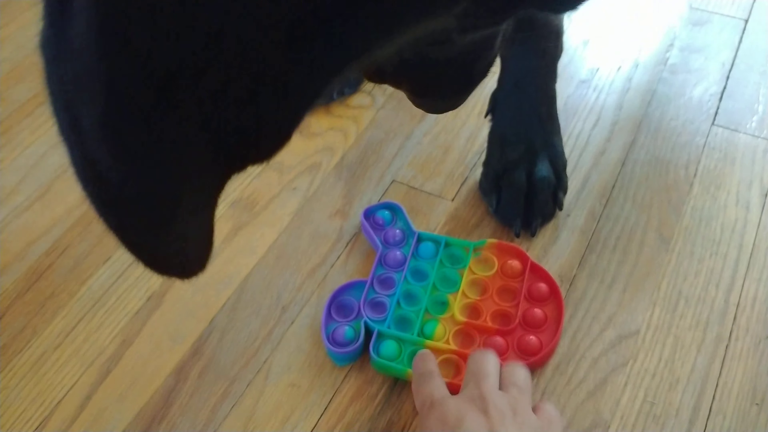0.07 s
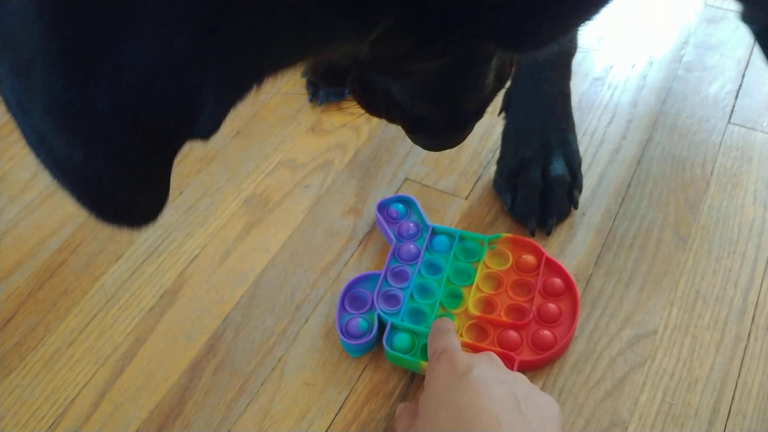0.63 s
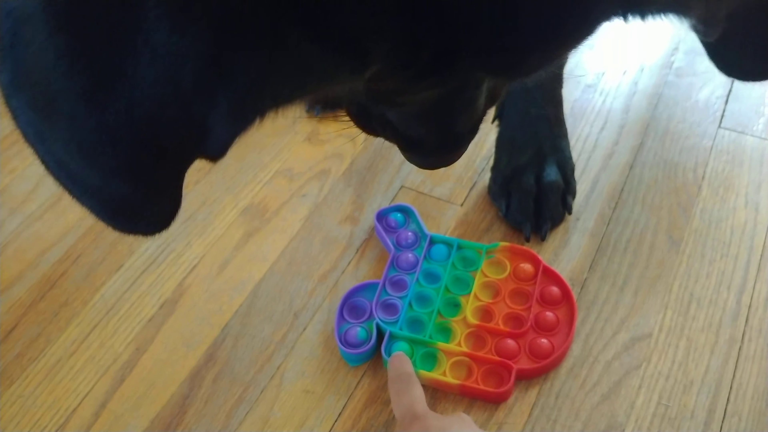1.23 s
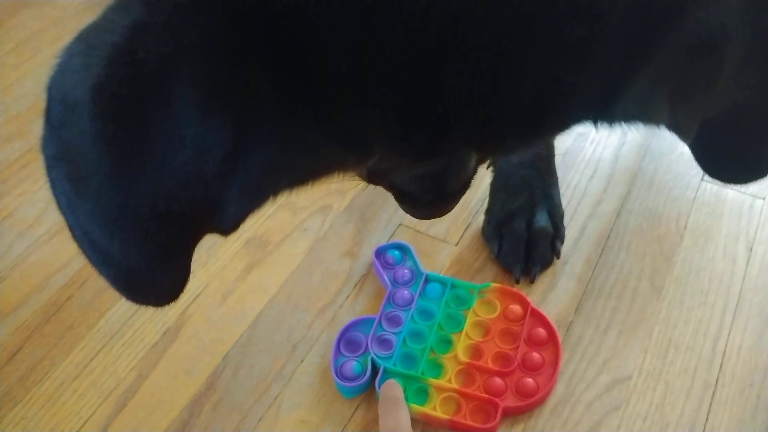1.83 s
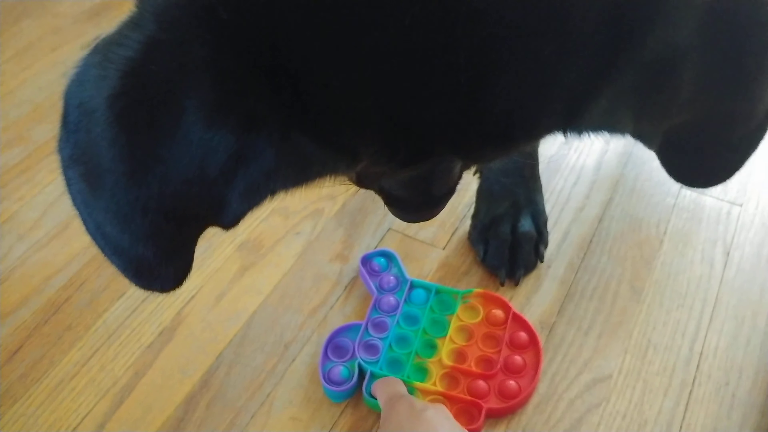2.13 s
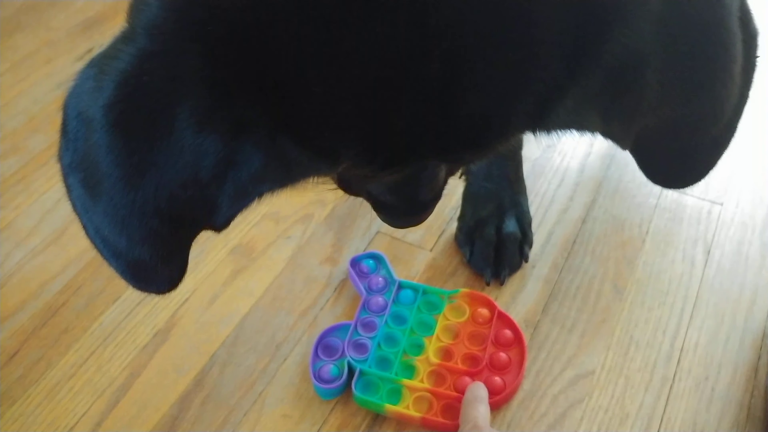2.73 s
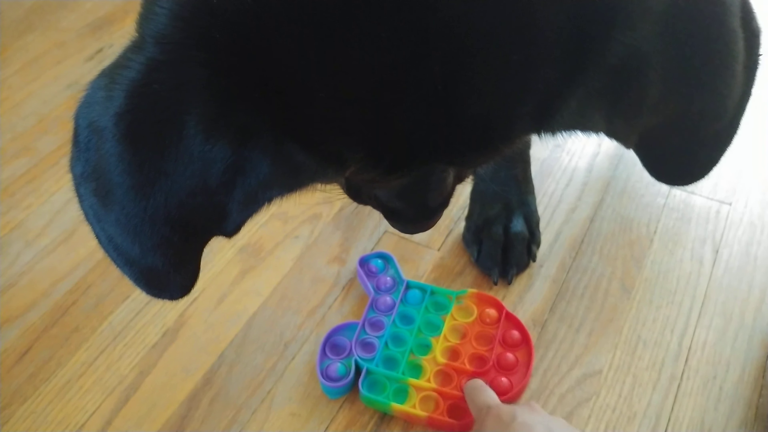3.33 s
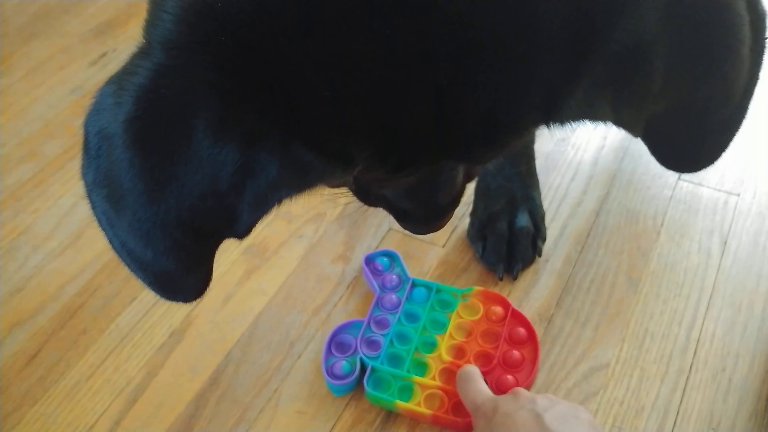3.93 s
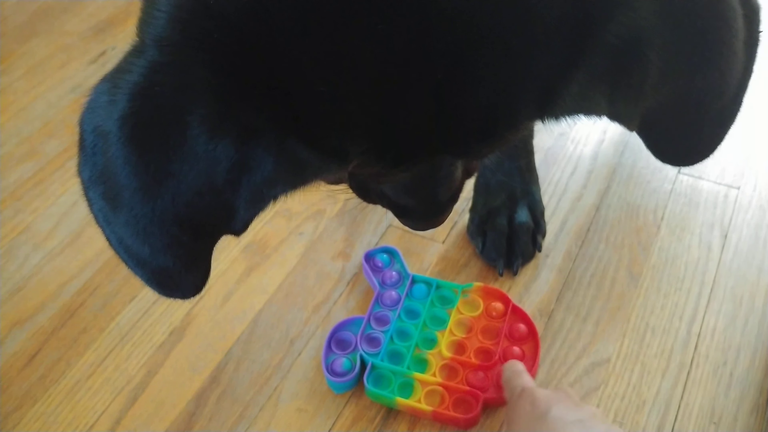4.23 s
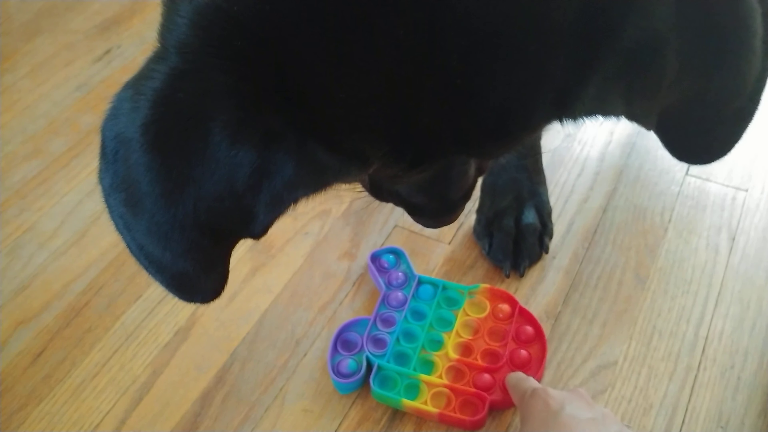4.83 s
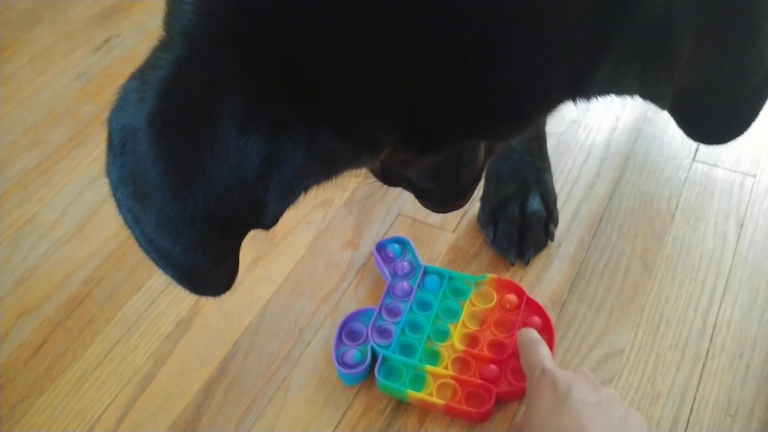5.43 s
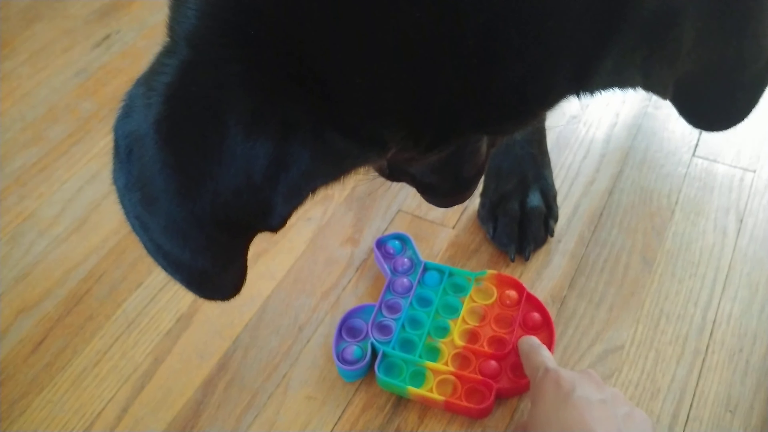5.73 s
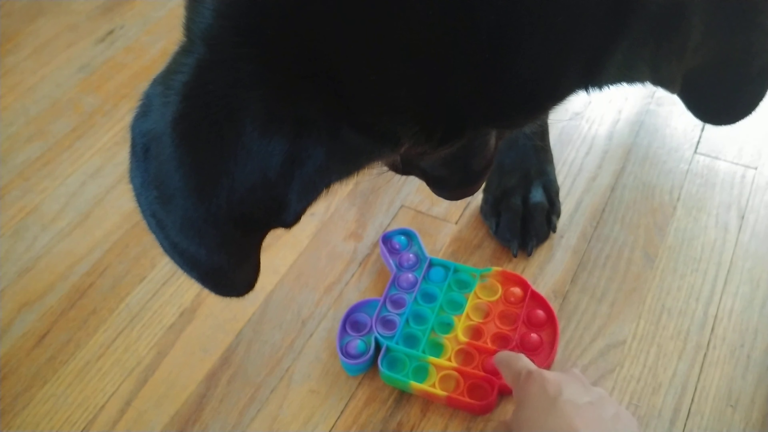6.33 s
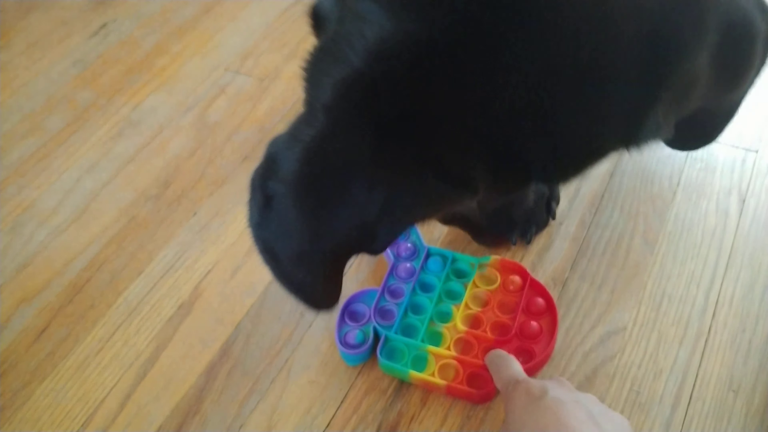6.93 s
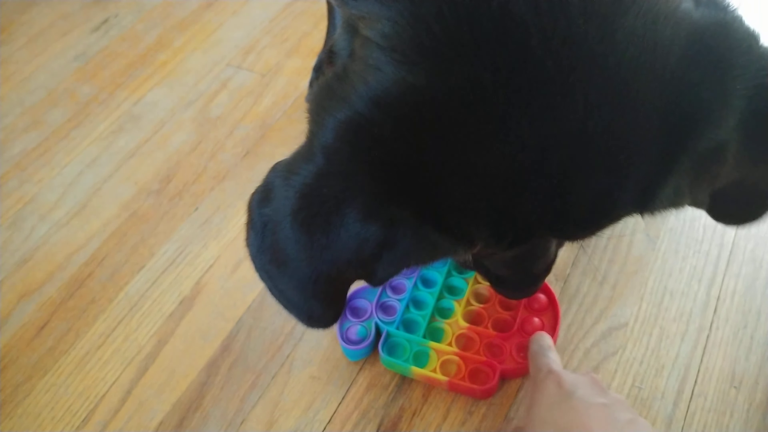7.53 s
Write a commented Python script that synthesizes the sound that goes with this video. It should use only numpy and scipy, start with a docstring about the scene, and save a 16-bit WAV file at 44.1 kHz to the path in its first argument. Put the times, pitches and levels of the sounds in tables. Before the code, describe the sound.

A steady, high hiss, a little like running water, fills a quiet room while a silicone popping toy is pressed by hand near the microphone. The toy taps and thumps softly against the floorboards, with one weak pop early on and some barely audible rubbing. Later come two distinct, slightly hollow pops, the loudest sounds, and a last soft thump follows near the end.

```python
"""Silicone bubble toy on a wooden floor

A finger works the toy: its rim taps the boards, soft impacts thump, and the fingertip rubs
by stick-slip friction. Three domes buckle and snap through, each exciting damped resonances.
The room reverberates briefly. A steady high hiss, like running water, slowly changes colour
above a low room noise. Both channels carry the same signal."""
import sys
import numpy as np
from scipy import signal
from scipy.fft import rfft, irfft, next_fast_len
from scipy.io import wavfile
from scipy.ndimage import uniform_filter1d

SR = 44100
rng = np.random.default_rng(int(sys.argv[2]) if len(sys.argv) > 2 else 0)


def put_to_file(sound):
    """Save the sound as 16-bit audio at rate SR, in the file named by the first command-line argument."""
    columns = np.atleast_2d(sound).T  # one column per channel
    safe = np.clip(columns, -1, 1)
    whole_steps = np.round(safe * 32767)
    wavfile.write(sys.argv[1], SR, whole_steps.astype(np.int16))


N = 339129

# spectral envelope of the hiss: f/Hz, relative level/dB
HISS_SPECTRUM = [(600, -35), (1700, -18), (2600, -9.5), (3400, -7.5), (3900, -3), (5200, 0), (6800, -1),
                 (7700, -3.5), (8800, 0.5), (9900, -8.5), (11000, -14), (12000, -21.5), (13500, -23),
                 (15600, -21)]
# resonances of the hiss: f/Hz, bandwidth/Hz, lift with its path open/dB, lift with it shaded/dB
HISS_RESONANCES = [(2800, 130, 3, 0), (3183, 320, 5.5, 1), (3740, 60, 3.5, 4), (4030, 490, 4.5, -0.5),
                   (5060, 190, 4.5, 5), (5450, 420, 4.5, -4.5), (6200, 430, 4.5, -1), (7136, 153, 9, 2.5),
                   (8130, 500, 2.5, 7.5), (8680, 220, 5, 4), (9550, 110, 7.5, 4), (10200, 810, 1, -1.5),
                   (11240, 220, 4.5, 2)]
# slow drift of the hiss: t/s, level/dB
HISS_ENVELOPE = [(0.0, -50.5), (0.56, -50.5), (0.94, -49), (1.39, -50.5), (2.31, -49.5), (2.7, -51.5),
                 (4.77, -49), (5.1, -50.5), (6.0, -48.5), (6.72, -51.5), (7.0, -50), (7.19, -51.5),
                 (7.65, -52), (7.69, -53)]
# spectral envelope of the room noise: f/Hz, relative level/dB
ROOM_NOISE_SPECTRUM = [(20, -28), (35, -17), (55, -10), (100, -1.5), (170, 0), (230, 0), (320, -5),
                       (550, -7.5), (1000, -9.5), (1700, -13.5), (3000, -19.5), (8000, -57)]
# reverberation time of the room: f/Hz, T60/s
ROOM_DECAY = [(120, 0.1), (300, 0.32), (800, 0.3), (1800, 0.25), (5000, 0.24)]
# the rim striking the boards: t/s, level/dB, f/Hz
RIM_TAPS = [(.0768, -48, 990), (.0815, -54, 745), (.3640, -51.5, 1230), (0.37, -51, 1260),
            (.3715, -50, 910), (.4980, -58, 985), (6.9370, -57, 540)]
# soft blows of finger and sheet on the floor: t/s, level/dB, f/Hz, knock re the blow/dB
SOFT_BLOWS = [(0.1931, -37, 217, -13.5), (0.3718, -43.5, 264, -4), (0.8636, -46, 394, -18),
              (.9790, -50, 128, -17), (1.0480, -60, 284, -17), (1.508, -56, 105, -19),
              (2.026, -49.5, 225, -20), (2.9470, -48, 229, 0), (3.0780, -43, 115, -12),
              (3.4520, -44, 202, -2), (3.7143, -49, 224, -2.5), (3.947, -54, 201, -8),
              (4.4110, -56, 330, -1), (4.995, -45, 215, -11), (5.584, -59.5, 229, 0),
              (5.985, -50, 214, -4.5), (6.8866, -41.5, 110, -18)]
# the fingertip dragging over silicone: t/s, duration/s, level before the envelope/dB
RUB_STROKES = [(0.764, 0.11, -66), (1.018, 0.058, -64), (1.972, 0.067, -63.5), (3.101, 0.15, -64.5),
               (3.73, 0.15, -65.5), (3.854, 0.12, -57.5), (6.776, 0.074, -68)]
# spectral envelope of the friction: f/Hz, relative level/dB
FRICTION_SPECTRUM = [(60, -37), (140, -3), (230, 5), (330, -1.5), (480, -2), (900, -12.5), (1600, -8.5),
                     (2600, -22), (5000, -54)]
# domes snapping through: t/s, level/dB, pulse f/Hz, dome f/Hz, dome level/dB,
# air pocket f/Hz, pocket level/dB, sheet level/dB (the last three levels re the pulse)
DOME_SNAPS = [(.8620, -47, 1400, 1890, 4, 926, 5, -17), (4.3270, -25.5, 1270, 1680, -4, 900, -11, 4.5),
              (6.1925, -29, 1430, 1780, -1, 915, -11, 8)]
# modes of the silicone sheet around the domes: f/Hz, relative level/dB, T60/s
SHEET_MODES = [(265, -30, 0.11), (560, -18.5, 0.013), (740, -31, 0.033), (1490, -25, 0.066),
               (2060, -24, 0.025), (3000, -28.5, 0.046)]


def amp(db):
    """Amplitude ratio of a level in decibels."""
    return 10 ** (np.asarray(db) / 20)


def unit_rms(x):
    """Normalisation to an rms of 1."""
    return x / np.sqrt(np.mean(x ** 2) + 1e-20)


def log_interp(points, hz):
    """Interpolation of (f, value) points on a logarithmic frequency axis."""
    f, values = np.transpose(points)
    return np.interp(np.log(hz + 1), np.log(f + 1), values)


def filtered(x, response):
    """Linear filtering: the spectrum is multiplied by a frequency response."""
    size = next_fast_len(len(x) + 8192)
    return irfft(rfft(x, size) * response(np.fft.rfftfreq(size, 1 / SR)), size)[:len(x)]


def coloured(x, spectrum):
    """Spectral shaping by (f, level) points, at an rms of 1."""
    return unit_rms(filtered(x, lambda hz: amp(log_interp(spectrum, hz))))


def low_cut(x, hz, order=2):
    """Butterworth high-pass filtering."""
    return signal.sosfilt(signal.butter(order, hz, "highpass", fs=SR, output="sos"), x)


def add(track, start_s, x):
    """Superposition of x on the track from a given time."""
    i = max(round(start_s * SR), 0)
    track[i:i + len(x)] += x[:max(len(track) - i, 0)]


def in_room(x, wet_db, build_s=0.0019, gap_s=0.0047):
    """Reverberation: a diffuse, decaying tail builds up once the nearest walls reflect the sound."""
    hz, t, bands = signal.stft(rng.standard_normal(SR // 2), SR, nperseg=256)
    tail = signal.istft(bands * amp(-60 * t / log_interp(ROOM_DECAY, hz)[:, None]), SR)[1]
    since = np.maximum(np.arange(len(tail)) / SR - gap_s, 0)
    tail *= 1 - np.exp(-(since / build_s) ** 2)
    return x + amp(wet_db) * signal.fftconvolve(x, tail / np.linalg.norm(tail))[:len(x)]


def ring(t, hz, t60):
    """Free vibration of a damped oscillator, starting at t = 0."""
    t = np.maximum(t, 0)
    return np.sin(2 * np.pi * hz * t) * np.exp(-np.log(1000) * t / t60)


def soft_ring(t, hz, t60, swell_cycles=0.43):
    """Compliant contact: rubber yields for half a cycle before it pushes at t = 0; the peak is 1."""
    since = np.maximum(t + .5 / hz, 0)
    swell = 1 - np.exp(-(since * hz / swell_cycles) ** 2)
    x = -ring(since, hz, t60) * swell
    return x / abs(x).max()


def pressure_pulse(t, hz):
    """A transient centred on t = 0: rarefaction, compression, rarefaction."""
    u = (np.pi * hz * t) ** 2
    return (1 - 2 * u) * np.exp(-u)


def smooth_field(shape, bins, frames):
    """Random fluctuation, correlated over frequency and time by moving averages."""
    across_frequency = uniform_filter1d(rng.standard_normal(shape), size=bins, axis=0)
    return unit_rms(uniform_filter1d(across_frequency, size=frames, axis=1))


def hiss(shade_from_s=2.6, shade_per_s=.19, patch_db=1.03, ripple_db=3.5, ripple_top_hz=11500):
    """Filtered noise: resonances change as its path is shaded; random ripple stands for interference."""
    hz, t, bands = signal.stft(rng.standard_normal(N), SR, nperseg=4096)
    shade = np.clip(shade_per_s * (t - shade_from_s), 0, 1)  # 0 open, 1 shaded
    colour_db = log_interp(HISS_SPECTRUM, hz)[:, None]
    for centre, width, open_db, shaded_db in HISS_RESONANCES:
        bump = .5 ** ((2 * (hz - centre) / width) ** 2)
        colour_db = colour_db + np.outer(bump, open_db + (shaded_db - open_db) * shade)
    patches = smooth_field(bands.shape, bins=9, frames=8)
    ripple = smooth_field(bands.shape, bins=2, frames=40)
    # the walls absorb the highest frequencies, so reflections ripple these less
    depth_db = ripple_db / (1 + (hz[:, None] / ripple_top_hz) ** 4)
    noise = signal.istft(bands * amp(colour_db + patch_db * patches + depth_db * ripple), SR)[1][:N]
    level_db = np.interp(np.arange(N) / SR, *np.transpose(HISS_ENVELOPE)) - 0.03
    return unit_rms(noise) * amp(level_db)


def room_noise(level_db=-68.5):
    """Stationary background noise, strongest at low frequencies."""
    return coloured(rng.standard_normal(N), ROOM_NOISE_SPECTRUM) * amp(level_db)


def rim_taps(wet_db=-5, rim_t60=0.028, ring_spill=0.54, click_gain=0.98):
    """Impulse excitation: the stiff rim meets the floor with a click and one damped mode."""
    out, t = np.zeros(N), np.arange(-SR // 200, SR // 2) / SR
    for start, db, hz in RIM_TAPS:
        rim = ring(t, hz, rim_t60)
        click = click_gain * pressure_pulse(t, hz)
        # the click fills the room; the ring is heard more directly
        tap = in_room(click + ring_spill * rim, wet_db) + (1 - ring_spill) * rim
        add(out, start + t[0], amp(db) * tap)
    return out


def thumps(wet_db=-8, body_t60=0.035, sheet_hz=220, knock_hz=470, knock_t60=0.02,
           tick_hz=1900, tick_t60=0.024):
    """Damped impact of rubber on wood: a few low cycles, a knock of the board and a contact tick."""
    out, t = np.zeros(N), np.arange(-SR // 100, SR // 2) / SR
    for start, db, hz, knock_db in SOFT_BLOWS:
        # blows below the sheet's usual pitch, pressed flat on the boards, die sooner
        t60 = body_t60 * min(hz / sheet_hz, 1) ** 1.85
        body = low_cut(soft_ring(t, hz, t60), 0.75 * hz, order=1)
        knock = soft_ring(t, knock_hz * np.exp(rng.normal(0, 0.062)), knock_t60)
        grit = filtered(rng.standard_normal(len(t)), lambda f: 1 / (1 + (f / tick_hz) ** 4))
        tick_envelope = (t >= 0) * np.exp(-np.log(1000) * abs(t) / tick_t60)
        tick = low_cut(grit * tick_envelope, knock_hz)
        tick_db = -2 + 1.3 * knock_db
        blow = body + amp(knock_db) * knock + amp(tick_db) * tick / abs(tick).max()
        add(out, start + t[0], amp(db) * in_room(blow, wet_db))
    return out


def rubs(wet_db=-5, slips_per_s=100, scatter=.15):
    """Stick-slip friction: the fingertip gives uneven pulses and noise that swell and fade each stroke."""
    out = np.zeros(N)
    for start, duration, db in RUB_STROKES:
        n = int(duration * SR)
        gaps = np.exp(scatter * rng.standard_normal(size=64)) / slips_per_s
        slip_samples = (np.cumsum(gaps) * SR).astype(int)
        slips = np.bincount(slip_samples, minlength=n)[:n]
        friction = unit_rms(slips) + rng.standard_normal(SR)[:n]
        envelope = np.sin(np.pi * np.arange(n) / n)
        add(out, start, amp(db) * coloured(friction, FRICTION_SPECTRUM) * envelope)
    return in_room(out, wet_db)


def dome_pops(wet_db=-4, ring_spill=0.47, dome_t60=0.02, pocket_t60=0.019, echo_s=0.00268, echo_gain=0.23):
    """Snap-through buckling: a dome flips with one pulse; dome, air pocket and sheet ring on."""
    out, t = np.zeros(N), np.arange(-SR // 200, SR // 2) / SR
    hollow_ring = amp(-29) * ring(t, hz=765, t60=0.19)  # lingers after each pop
    for start, db, pulse_hz, dome_hz, dome_db, pocket_hz, pocket_db, sheet_db in DOME_SNAPS:
        # each mode starts part of a cycle early, so that it crests with the pulse
        sheet = sum(amp(level + rng.normal(0, 1)) * ring(t + .25 / hz, hz, t60)
                    for hz, level, t60 in SHEET_MODES)
        dome = -ring(t + .75 / dome_hz, dome_hz, dome_t60)
        pocket = ring(t + .25 / pocket_hz, pocket_hz, pocket_t60)
        modes = amp(dome_db) * dome + amp(pocket_db) * pocket + amp(sheet_db) * sheet
        # a near surface returns a duller copy of the pulse
        pulse = pressure_pulse(t, pulse_hz) - echo_gain * pressure_pulse(t - echo_s, pulse_hz / 2)
        pop = in_room(pulse + ring_spill * modes, wet_db) + (1 - ring_spill) * modes + hollow_ring
        # so small a dome radiates little bass
        add(out, start + t[0], amp(db) * low_cut(pop, hz=200))
    return out


def scene():
    """Superposition: all sources sum at one point, alike in both channels."""
    mono = dome_pops() + thumps() + rim_taps() + rubs() + hiss() + room_noise()
    return np.array([mono, mono])


def record(dry, bottom_hz=46, top_hz=15800):
    """Band limiting: deep bass rolls off and the highest treble is removed."""
    return np.array([filtered(x, lambda hz: hz < top_hz) for x in low_cut(dry, bottom_hz, order=4)])


dry = scene()
out = record(dry)
put_to_file(out)
```